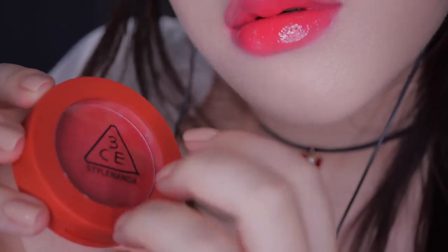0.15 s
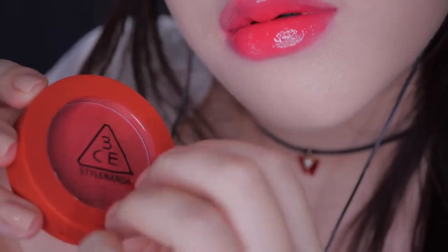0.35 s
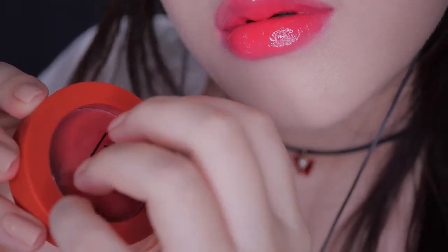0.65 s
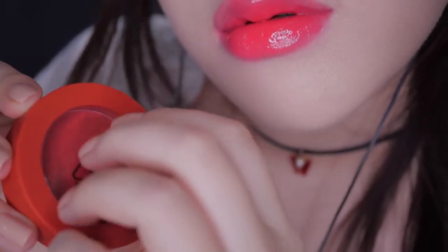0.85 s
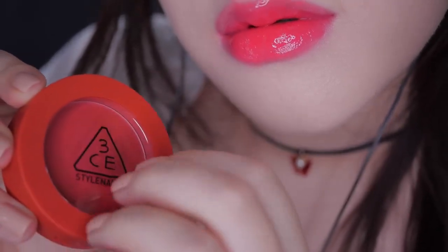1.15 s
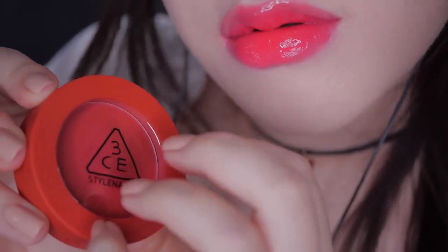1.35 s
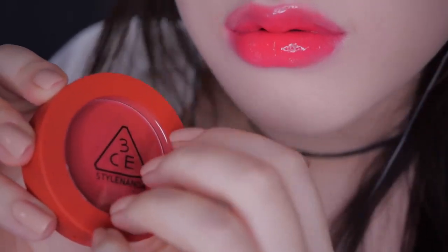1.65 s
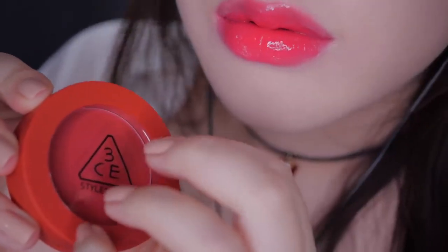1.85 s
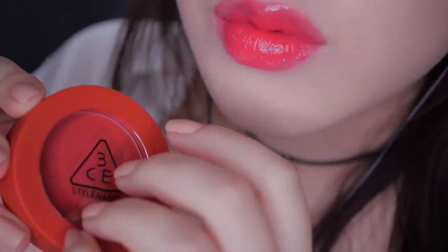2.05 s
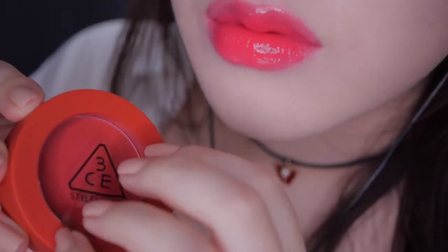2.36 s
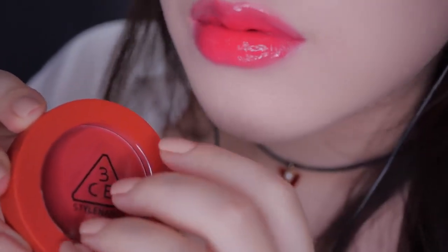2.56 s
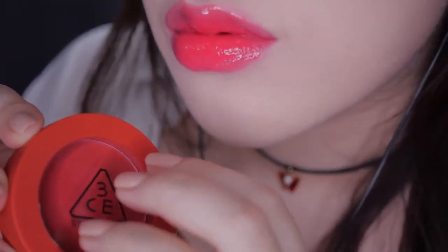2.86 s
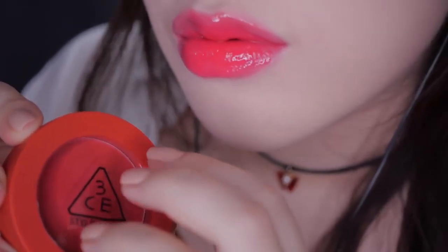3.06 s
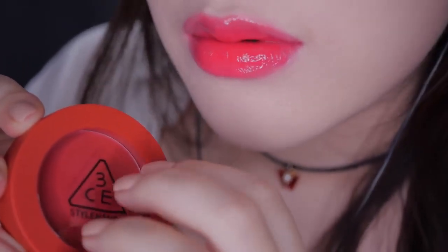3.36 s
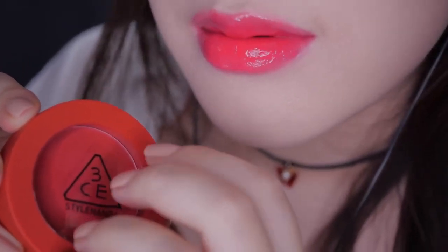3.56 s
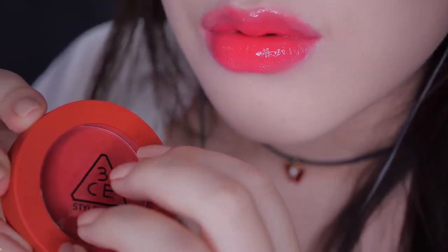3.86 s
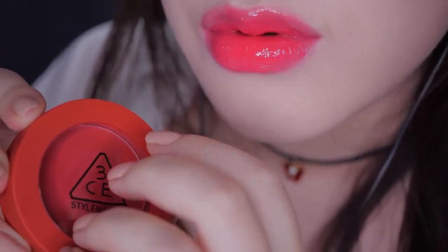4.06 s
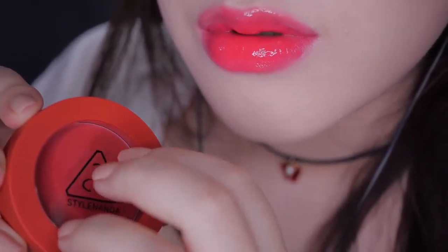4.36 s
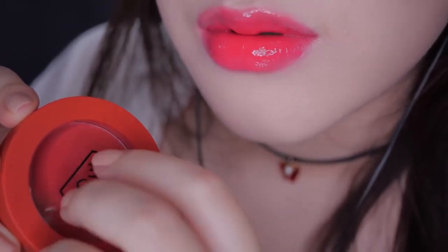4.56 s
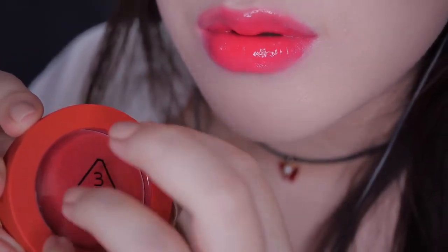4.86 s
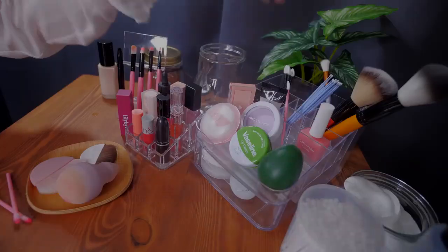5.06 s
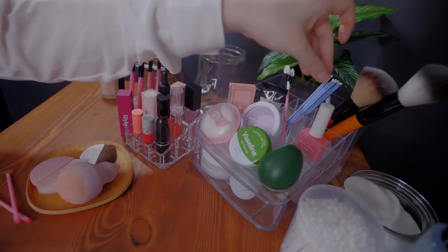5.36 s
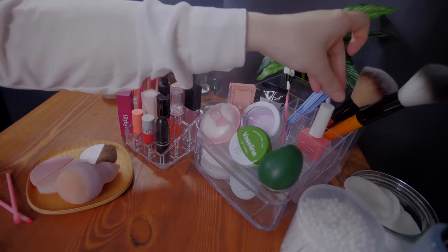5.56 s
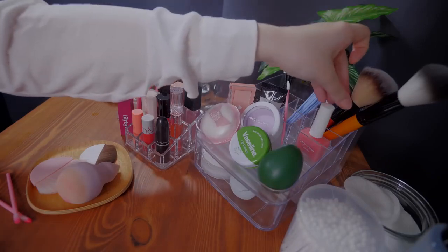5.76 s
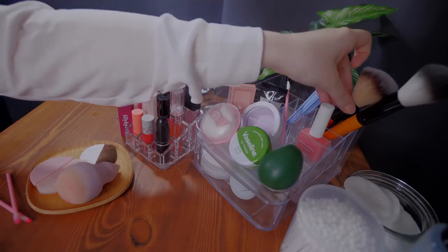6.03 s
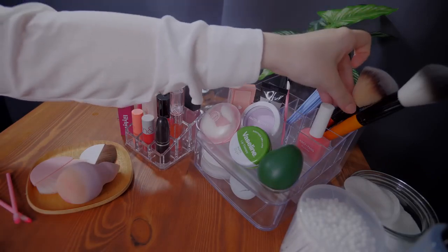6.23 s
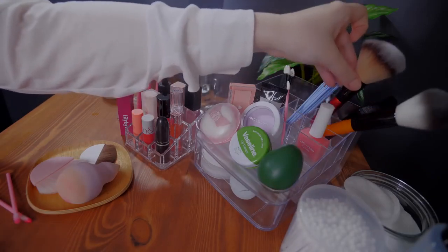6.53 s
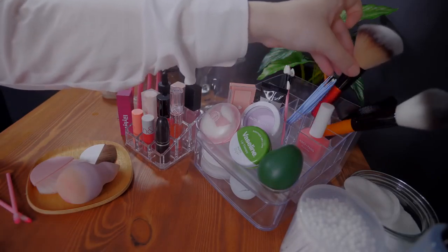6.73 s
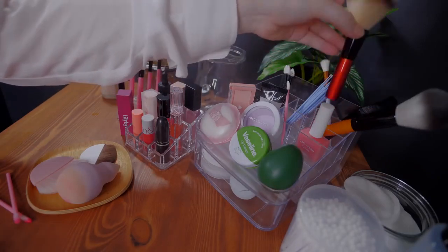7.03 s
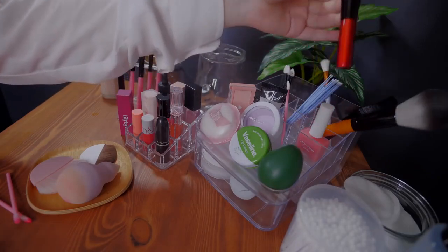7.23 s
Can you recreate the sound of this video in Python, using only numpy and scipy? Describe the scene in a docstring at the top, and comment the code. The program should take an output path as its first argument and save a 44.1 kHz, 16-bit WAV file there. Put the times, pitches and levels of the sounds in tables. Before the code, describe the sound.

A low, wavering rumble and faint room hiss run throughout. From the start until about 5.2 seconds, fingernails tap irregularly on a small plastic powder case, very close and slightly left, each tap a short, dry click with a tiny ring. The loudest lands at about 0.5 seconds, with other clear ones near 0.8, 1.7, 3.3, 3.8 and 5.2. Fingertips rub softly between taps, sticking and slipping, most noticeably from 0.5 to 1.3 seconds. A few dull finger bumps occur, and the case creaks faintly near 3.9. At 5.3 a tiny double click sounds on the right. Further left, a plastic tray gives a light knock at about 5.9 seconds. From 6.4 to 6.7 a brush handle scrapes faintly out of it with hollow knocks and clatter, sharpest at 6.6. Only the background remains until the end, around 7.4 seconds.

```python
"""A low wavering rumble and a faint room hiss run from start to finish.
For the first five seconds, fingernails tap and fingertips rub a small plastic powder case just left
of the listener: taps make it ring briefly, and skin sticks and slips on it. Two tiny clicks follow
on the right. From about six seconds, further left, a hand pulls a brush out of a clear plastic tray,
scraping and knocking its neighbours."""
import sys
import numpy as np
from scipy import signal
from scipy.fft import rfft, irfft, next_fast_len
from scipy.io import wavfile
from scipy.ndimage import uniform_filter1d

SR = 44100
rng = np.random.default_rng(int(sys.argv[2]) if len(sys.argv) > 2 else 0)


def wav_out(sig):
    """Save sig, one row per channel (or a flat mono array), as 16-bit PCM at SR to the path in sys.argv[1]."""
    wavfile.write(sys.argv[1], SR, np.round(np.clip(np.atleast_2d(sig).T, -1, 1) * 32767).astype(np.int16))


N = 325899

# Levels in the tables are relative: the functions add their own gains.
# the tones the case rings with (pitch [Hz], level [dB], time to fade by 60 dB [s])
CASE_TONES = [(134, 3, 0.0092), (283, -2.5, 0.013), (497.7, -12, 0.018), (688, -7.5, 0.024),
              (708, 0, 0.018), (927, -7, .035), (1033.4, 9, 0.014), (1270, -8.5, 0.019),
              (1363, -11.5, 0.024), (1257.4, 3, 0.0076), (1500, -2.5, 0.0058), (2390, 0.5, 0.045),
              (3681, -6.5, 0.014), (4720, -5.5, 0.018), (4670, -6, 0.011), (5980, 2.5, 0.013),
              (7140, -1.5, 0.0097)]
# borders between its thump, lid, rim, shell, snap, clack and tick tones (pitch [Hz])
CASE_BORDERS = [400, 880, 1180, 1750, 2700, 5200]
# each tap and what its parts add to its strength
# (time [s], strength [dB], finger pad [dB], rim [dB], flat of nail [dB], nail tip [dB])
TAP_HITS = [(0.3165, -30, 2.5, -7, -11.5, -2), (0.4287, -21, -7.5, -9, -8, -7),
            (.4886, -9.5, -14, -22, -26, -7.5), (0.6925, -39.5, 2, -30, -8.5, -6),
            (0.8304, -31.5, 0.5, -5.5, -6, -9), (0.849, -29, 6, 0.5, 2, 0.5),
            (.8807, -46, 4.5, -12, -5, -16), (1.399, -54, -15, -29, -23, -18),
            (1.4575, -44.5, -1.5, -9, -19, -16.5), (1.7122, -20.5, -8.5, -11.5, -5, -10),
            (1.8358, -59.5, -12.5, -4.5, -24, -24), (2.0437, -41.5, 5.5, -9, -0.5, -4),
            (2.1921, -44.5, -1.5, -2, -4, -15.5), (2.2222, -29.5, -5.5, -6, -1, -21),
            (2.3266, -52, -18, -12, -14, -1), (2.369, -62, -4, -7, -5, -3),
            (2.4271, -70.5, 15, 1.5, -3, -15), (2.528, -59, 6.5, -18, -12, -16),
            (2.826, -62, -9.5, -3, -24.5, -7), (2.9371, -45, 3.5, -14.5, -7.5, -9),
            (3.125, -38.5, 2.5, -11, -7.5, -2.5), (3.3035, -36, -3.5, -5.5, -3, -6.5),
            (3.3301, -26, -1, -6, -1.5, -12), (3.4345, -35, -2, -6, -12, -9),
            (3.5999, -48, 8.5, -6, -4.5, -7), (3.687, -48.5, 7, -10, -2, 0.5),
            (3.7948, -29.5, -4.5, -25, 1.5, -11), (3.82, -38, -3.5, -9, -2, -8),
            (3.8418, -24, -1.5, -9.5, 0.5, -8), (3.8759, -51.5, -3, 0, -13, -14),
            (4.003, -67, 9, -11, 0, 0), (4.092, -48, 8, -35, -5, -4), (4.2588, -39, -2.5, -7, -3.5, -9),
            (4.2989, -32.5, 1, -6, 6, -7), (4.4458, -54, -1, -3.5, -3, -6), (4.6326, -43, 8.5, -4, 1, -6),
            (4.7376, -38, 1.5, -9, -6.5, -31.5), (4.9451, -36.5, 3, -40, -5.5, -6),
            (5.152, -30.5, -3.5, -6.5, -4, -0.5), (5.1642, -26.5, -1.5, 4, 3, 1)]
# the four noises in a tap, from lowest to highest (frequency [Hz], level [dB])
SNAP_COLOUR = [(1500, -28), (1850, -2.5), (2250, 4), (2600, 1.5), (3000, -30)]
CLACK_COLOUR = [(2300, -10.5), (2800, -5), (3600, -5), (4100, -9), (4600, -10), (5200, -17), (5800, -39.5)]
TICK_COLOUR = [(4600, -30.5), (5300, -16.5), (5900, -1.5), (7000, 6.5), (8600, -2), (10000, -11.5),
               (11000, -34.5)]
EDGE_COLOUR = [(9000, -32.5), (10300, 1.5), (12000, -4), (14500, -13), (17000, -25)]
# fingertip strokes (start [s], length [s], level [dB], change by the end [dB], skin dryness [dB])
FINGER_STROKES = [(0, .3, -69.5, 0, 0.5), (0.101, 0.024, -71, 2, -5), (0.511, 0.22, -54.5, -6.5, -2),
                  (0.671, 0.032, -56.5, -7.5, -8), (0.744, .09, -76, -0.5, 1), (0.886, 0.14, -68, 2, 2),
                  (1.033, 0.055, -46, -15, 0), (1.087, 0.063, -48, -2, 1), (1.162, 0.036, -49.5, -12, 0.5),
                  (1.2, 0.04, -47, -9, -2), (1.241, 0.031, -45.5, -6.5, -3), (1.28, 0.04, -58, -2, -4),
                  (1.326, 0.11, -77.5, 4, -6.5), (1.4, 0.067, -65, 5.5, -5.5), (1.5, .2, -81, 4, -7.5),
                  (1.738, 0.072, -65.5, 7.5, -7), (1.821, 0.05, -71, -4, -2.5),
                  (1.878, 0.04, -60, -2.5, -1), (1.927, 0.09, -72.5, -13, -3.5),
                  (2.33, 0.057, -60.5, -25, -3), (2.429, 0.077, -60.5, -31, -3.5),
                  (2.524, 0.053, -63.5, -20, -5.5), (2.649, .015, -68.5, -1, -10.5),
                  (2.72, 0.037, -73.5, -0.5, -3.5), (3.151, 0.058, -78, -8, -11),
                  (3.538, 0.028, -77.5, -1, -10), (4.44, 0.057, -68, -13.5, -2.5),
                  (4.586, 0.04, -81.5, -2.5, -2.5), (4.654, 0.048, -75, -6, -3.5),
                  (4.803, 0.018, -71, -7.5, -12), (4.913, .04, -71, 13, -5.5), (4.955, 0.025, -73, -5, 1.5),
                  (5.063, 0.037, -83, -0.5, -3), (5.206, 0.077, -70, -8, -10), (5.311, 0.037, -82, -4, -9)]
# how strongly rubbing rings each group of tones, thump to tick (level [dB])
RUB_DRIVE = [-34, -23, -6, 10, -14.5, -29.5, -27]
# the gripping hand rumbles (time [s], level [dB])
GRIP_RUMBLE = [(0.0, -54), (0.07, -66.5), (0.43, -62.5), (0.98, -67.5), (1.29, -80), (1.44, -68),
               (1.67, -78.5), (1.83, -69.5), (2.77, -73.5), (3.89, -73), (4.29, -72.5), (4.51, -70.5),
               (5.17, -72), (5.4, -68.5)]
# the case creaks in the grip (time [s], level [dB])
GRIP_CREAK = [(3.91, -75), (3.928, -43.5), (3.958, -60), (3.964, -46.5), (4.03, -91)]
# finger pads land softly (time [s], level [dB], starting pitch [Hz])
PAD_BUMPS = [(1.243, -38.5, 111), (1.895, -36, 160), (1.928, -36.5, 136), (3.574, -49, 146.5),
             (4.458, -42, 87.5)]
# the tones of the tray and brush handles (pitch [Hz], level [dB], time to fade by 60 dB [s])
TRAY_TONES = [(85.5, 1, 0.14), (303.6, 2.5, 0.098), (384.4, -3, 0.15), (583, -3.5, 0.056),
              (702, 9.5, 0.033), (760, -6, 0.035), (930, -8.5, 0.037), (1047, -9.5, 0.017),
              (1152, 3.5, 0.011), (1452, -9.5, 0.021), (1555, 0, 0.014), (1730, -27, 0.011),
              (1694, -4.5, 0.014), (2050, -30, 0.069), (2370, -5, 0.0086)]
# knocks in the tray (time [s], level [dB], boom [dB], hollow ring [dB], clatter [dB], rattle time [s])
TRAY_KNOCKS = [(5.887, -59, -30.5, -24.5, -10.5, 0.011), (5.9, -36, -20, -19, -19, 0.0084),
               (6.008, -51, -9, -5, -34, 0.0065), (6.416, -60.5, 12, 14.5, -14, 0.011),
               (6.446, -37, -29, -4.5, -12, 0.0022), (6.462, -47, 8, 6, -19, 0.018),
               (6.536, -55, -3, 2, -17, 0.036), (6.584, -49, -22, -4, -10, 0.024),
               (6.603, -36, -26, -23, -2.5, 0.011), (6.618, -18, -26, -10.5, -7, 0.0088),
               (6.653, -43, 4.5, 2.5, -36, 0.01)]
# the tray's crowded high tones (frequency [Hz], level [dB])
CLATTER_COLOUR = [(1800, -26), (2500, -1), (3700, 3), (5200, -8), (7300, -2.5), (9000, -14), (10400, -4.5),
                  (12500, -14), (16000, -35)]
# the handle slides past its neighbours (time [s], level [dB])
HANDLE_SLIDE = [(6.46, -73), (6.502, -77.5), (6.552, -63.5), (6.596, -72), (6.6, -70)]
# clicks on the right (time [s], level [dB])
TINY_CLICKS = [(5.317, -52.5), (5.324, -47.5)]
# the background rumble swells and drifts (time [s], level [dB], left minus right [dB])
RUMBLE_SWELLS = [(0.0, -55, 20), (0.18, -49.5, -6), (1.09, -55.5, 5), (1.67, -51.5, 0.5), (2.08, -45, 14.5),
                 (2.16, -48.5, -2.5), (2.96, -50, 9.5), (3.07, -52.5, 1.5), (4.98, -53.5, -5.5),
                 (5.29, -46, -11.5), (5.72, -44, 2.5), (6.36, -47.5, -3.5), (6.46, -50, 3.0),
                 (6.52, -48, -5), (6.85, -53.5, 7.5), (6.89, -53, -5), (7.33, -50.5, -8), (7.39, -60, 1)]
# the rumble, the hiss, and the extra hiss while the hands are close (frequency [Hz], level [dB])
RUMBLE_COLOUR = [(10, -8), (20, -2), (28, -3), (36, -0.5), (43, -7.5), (52, -25.5), (62, -39.5)]
HISS_COLOUR = [(45, -33.5), (62, -20.5), (120, -29), (200, -38), (400, -46), (900, -52), (2000, -55.5),
               (2400, -57.5), (5200, -63.5), (6500, -62.5), (8000, -64.5), (11500, -67), (12500, -73.5),
               (16000, -87.5)]
NEAR_HISS_BOOST = [(70, 6), (200, 2.5), (600, 1.5), (3000, 2.5), (12000, 4)]


def case_taps():
    """A nail rings the case; where and how hard it lands sets the mix of tones and noise."""
    out = np.zeros((2, N))
    count = len(TAP_HITS)
    group = np.searchsorted(CASE_BORDERS, np.array(CASE_TONES)[:, 0])
    chance = rng.standard_normal((count, 2, len(CASE_TONES)))
    # crowded, short high tones sound like noise: a quick fade plus a faint longer one
    clacks = bursts(CLACK_COLOUR, count, shared=.79) * (fade(.0087) + undb(-31) * fade(.028))
    snaps = bursts(SNAP_COLOUR, count, shared=.17) * (fade(.019) + undb(-21.5) * fade(.06))
    ticks = bursts(TICK_COLOUR, count, shared=.54) * (fade(.0067) + undb(-27.5) * fade(.04))
    edges = bursts(EDGE_COLOUR, count, shared=.33) * (fade(.0084) + undb(-28) * fade(.033))
    ring_rise, noise_rise = (1 - fade(.001)) ** 2, (1 - fade(.00098)) ** 2  # the contact builds up
    for i, (start, strength, pad, rim, clack, tick) in enumerate(TAP_HITS):
        # snap and sharp edge grow more slowly than the tap's strength
        snap = -48 + .63 * (strength + 38) + .22 * pad - strength
        edge = tick - 12.5 - .067 * (strength + 40.5)
        group_db = np.array([pad + 3, pad - 2.5, rim + 3, 6, snap + 1.5, clack - 1.5, tick - 1.5])
        gains = undb(group_db[group] + 1.2 * chance[i, 0])
        ring = gains @ rings(CASE_TONES, .006 * chance[i, 1], np.full(len(CASE_TONES), np.pi))
        noise = undb(snap + 6.5) * snaps[i] + undb(clack + 9) * clacks[i] + undb(tick + 8.5) * ticks[i]
        tap = ring_rise * ring + noise_rise * noise + undb(edge + 3.5) * edges[i]
        add(out, start, undb(strength) * tap)
    left = undb(1) * out[0]
    right = undb(-1) * far_ear(out[1], shadow_hz=3000, shadow_db=-3)
    right -= (1 - undb(-4)) * band(right, 49, 510)  # less thump reaches the far ear
    return np.array([left, right]) + undb(-26) * room_echo(left, fade_s=.08, top_hz=2500)


def case_rubs():
    """Slipping skin rings the case; the gripping hand rumbles and makes it creak."""
    damped = np.array(CASE_TONES) * [1, 1, .6]  # the finger shortens the ring
    drive = undb(RUB_DRIVE)[np.searchsorted(CASE_BORDERS, damped[:, 0])]
    ring = drive @ rings(damped, np.zeros(len(damped)), np.zeros(len(damped)))
    grit = slips(.05, 2)
    flutter = undb(4 + 2.1 * unit(band(rng.standard_normal(N), 17, 70)))  # the skin grips unevenly
    rub = unit(signal.fftconvolve(grit, ring)[:N]) * stroke_gain(lambda db, dryness: db) * flutter
    scratch = unit(shaped(SNAP_COLOUR[:4] + CLACK_COLOUR[1:], grit))
    scratch *= stroke_gain(lambda db, dryness: db + dryness + 3.5)
    bright = [(4000, -33), (5200, -9.5), (6000, -6.5), (7900, -6), (10500, -14.5), (13500, -14),
              (16000, -24)]
    skin = np.array([unit(shaped(bright, slips(.15, 2))) for _ in range(2)]) * undb([[3], [-.1]])
    skin *= stroke_gain(lambda db, dryness: -69 + .45 * (db + 61.5) + dryness)
    hand = unit(band(rng.standard_normal(N) + .61 * rng.standard_normal((2, N)), 110, 190))
    hand *= undb([[2.5], [-4]]) * gain_curve([GRIP_RUMBLE])
    dull = [(120, -4.5), (250, 9.5), (600, 1.5), (1200, -5), (3800, -19.5), (5000, -45)]
    creak = unit(shaped(dull, slips(.04, 3.4))) * gain_curve([GRIP_CREAK]) * undb(4)
    case = rub + scratch + creak
    right = undb(-4.5) * far_ear(case, shadow_hz=2980, shadow_db=-1)
    return np.array([undb(-1.04) * case, right]) + skin + hand


def stroke_gain(level, release_s=.01):
    """Loudness as the finger slides and lets go; level(db, dryness) gives one layer's dB."""
    curves = []
    for start, length, db, change, dryness in FINGER_STROKES:
        end, end_db = start + length, level(db + change, dryness)
        curves.append([(start, level(db, dryness)), (end, end_db), (end + release_s, end_db - 11)])
    return gain_curve(curves)


def pad_bumps():
    """A finger pad lands softly: a gentle rise and one dull, falling tone."""
    out = np.zeros(N)
    t = np.arange(SR // 8) / SR
    for start, db, hz in PAD_BUMPS:
        tone = np.sin(2 * np.pi * hz * t * (1 - .64 * t))
        add(out, start, undb(db) * (1 - fade(.018)) * fade(.12) * tone)
    return out * undb([[2.5], [-2.5]])


def brush_tray():
    """The brush scrapes along, and each knock is a brief rattle that rings the tray."""
    out = np.zeros((2, N))
    group = np.searchsorted([450, 800], np.array(TRAY_TONES)[:, 0])  # boom, hollow ring, the rest
    t = np.arange(SR // 16) / SR
    count = len(TRAY_KNOCKS)
    chance = rng.standard_normal((count, 3, len(TRAY_TONES)))
    contacts = rng.standard_normal((count, 2, len(t)))
    clatters = bursts(CLATTER_COLOUR, count, shared=.13)
    for i, (start, db, boom, hollow, clatter_db, rattle_s) in enumerate(TRAY_KNOCKS):
        loudness, detune, phase = chance[i]
        trigger, size = contacts[i]
        rattle = .5 * (trigger > 1.6) * size * np.exp(-t / rattle_s)
        rattle[0] = 1  # the first hit
        clatter = clatters[i] * (fade(.036) + .89 * fade(8 * rattle_s))
        for ear in range(2):  # 0 is left, 1 is right
            at = start + (1 - ear) * 25 / SR  # the right ear hears it first, but weaker
            tones = rings(TRAY_TONES, .008 * detune, np.pi + ear * 1.5 * phase)
            tones *= undb(1.5 * loudness)[:, None] * (1 - fade(.0066))
            for k, part_db in enumerate((boom + 3, hollow + 1.3, -.5)):
                ring = unit(signal.fftconvolve(tones[group == k].sum(axis=0), rattle))
                add(out[ear], at, ring * undb(db + part_db - 14 - 8.3 * ear))
            add(out[ear], at, clatter[ear] * undb(db + clatter_db - 5 - 9.5 * ear))
    scrape = np.array([unit(shaped(CLATTER_COLOUR, slips(.058, 2.2))) for _ in range(2)])
    scrape *= gain_curve([HANDLE_SLIDE]) * undb([[3], [-3]])
    return out + scrape + undb(-13) * room_echo(out[0], fade_s=.076, top_hz=4000)


def clicks():
    """Single dull pulses, mostly in the right ear."""
    out = np.zeros(N)
    for start, db in TINY_CLICKS:
        add(out, start, undb(db) * np.exp(-np.arange(200) / 29))
    return out * undb([[-2], [7]])


def rumble(waver=.42):
    """Deep noise that swells slowly and wavers at random, partly shared by the ears."""
    t = np.arange(N) / SR
    times, db, pan_db = np.transpose(RUMBLE_SWELLS)
    both, left, right = (unit(shaped(RUMBLE_COLOUR)) for _ in range(3))
    wave = signal.hilbert(np.array([both + 1.8 * left, both + 3.9 * right]), next_fast_len(N))[:, :N]
    steadier = np.real(wave / (np.abs(wave) + .1) ** (1 - waver))  # tames the noise's own swells
    pan = np.interp(t, times, pan_db) / 2
    low = unit(steadier) * undb(np.interp(t, times, db) + 5 + np.array([pan, -pan]))
    return signal.sosfilt(signal.butter(6, 52, fs=SR, output="sos"), low)


def hiss(level_db=-69, hands_leave_s=5.05):
    """Room and microphone noise, a little stronger while the hands are close."""
    hz, db = np.transpose(HISS_COLOUR)
    boost_hz, boost_db = np.transpose(NEAR_HISS_BOOST)
    near_colour = np.transpose([hz, db + np.interp(np.log(hz), np.log(boost_hz), boost_db)])
    close = uniform_filter1d(1. * (np.arange(N) < hands_leave_s * SR), size=2000)
    ears = []
    for _ in range(2):
        far, near = shaped(HISS_COLOUR), shaped(near_colour)
        gain = undb(level_db) / np.sqrt(np.mean(band(far, 100, 16000) ** 2))
        ears.append(gain * (far * np.sqrt(1 - close) + near * np.sqrt(close)))
    return np.array(ears)


def room_echo(x, fade_s, top_hz):
    """The room adds a short blur of echoes, different in each ear."""
    t = np.arange(SR // 4) / SR
    tail = band(rng.standard_normal((2, len(t))), 170, top_hz)
    tail *= np.exp(-np.log(1000) * t / fade_s) * (1 - np.exp(-t / .0013))
    return signal.fftconvolve(x[None], tail / np.sqrt(np.sum(tail ** 2) / 2), axes=1)[:, :N]


def far_ear(x, shadow_hz, shadow_db, lag_samples=9):
    """Sound reaches the far ear later, and the head dulls its treble."""
    low = signal.lfilter(*signal.butter(1, shadow_hz, fs=SR), x)
    return np.pad(low + undb(shadow_db) * (x - low), (lag_samples, 0))[:N]


def rings(tones, detune, phase):
    """A struck object rings: one fading sine wave per tone, a row each."""
    hz, db, fade_s = np.transpose(tones)[:, :, None]
    t = np.arange(SR // 8) / SR
    return undb(db) * np.sin(2 * np.pi * hz * (1 + detune[:, None]) * t + phase[:, None]) * fade(fade_s)


def slips(share, spread_db):
    """Surfaces stick and slip: a share of the samples become clicks of uneven size."""
    trigger, side, size = rng.random((3, N))
    return unit((trigger < share) * np.sign(side - .5) * undb(-spread_db * np.log(1 - size)))


def bursts(colour, count, shared):
    """Short noises, one per event and ear; the ears share a part."""
    noise = rng.standard_normal((count, 3, SR // 8))
    return unit(shaped(colour, np.sqrt(shared) * noise[:, :1] + np.sqrt(1 - shared) * noise[:, 1:]))


def shaped(colour, source=None):
    """Give noise, or another source, a colour (frequency [Hz], level [dB])."""
    x = rng.standard_normal(N) if source is None else source
    n = x.shape[-1]
    hz, db = np.transpose(colour)
    freqs = np.maximum(np.arange(n // 2 + 1) * SR / n, 1)
    return irfft(rfft(x) * undb(np.interp(np.log(freqs), np.log(hz), db)), n)


def gain_curve(curves):
    """Join curves (time [s], level [dB]) into one smooth gain, silent between them."""
    t, gain = np.arange(N) / SR, np.zeros(N)
    for rows in curves:
        times, db = np.transpose(rows)
        gain += undb(np.interp(t, times, db)) * (t >= times[0]) * (t < times[-1])
    return uniform_filter1d(gain, size=200)


def fade(fade_s):
    """Die away by 60 dB every fade_s seconds."""
    return np.exp(-np.log(1000) * np.arange(SR // 8) / SR / fade_s)


def band(x, low_hz, high_hz):
    """Keep what lies between two frequencies."""
    return signal.sosfilt(signal.butter(2, [low_hz, high_hz], "bandpass", fs=SR, output="sos"), x)


def add(out, start_s, x):
    """Mix x in at start_s."""
    i = int(start_s * SR)
    out[..., i:i + x.shape[-1]] += x[..., :N - i]


def undb(db):
    """Turn decibels into a gain."""
    return 10 ** (np.asarray(db, float) / 20)


def unit(x):
    """Scale to an average (rms) level of 1."""
    return x / np.sqrt(np.mean(x ** 2))


def scene():
    """Case, tray and background together."""
    return case_taps() + case_rubs() + pad_bumps() + brush_tray() + clicks() + rumble() + hiss()


def record(dry):
    """Round off the loudest peaks and cut the highest treble."""
    ceiling, top_hz = .7, 16500
    rounded = ceiling * np.tanh(dry / ceiling)
    return signal.sosfilt(signal.ellip(14, .2, 100, top_hz, fs=SR, output="sos"), rounded)


dry = scene()
out = record(dry)
wav_out(out)
```